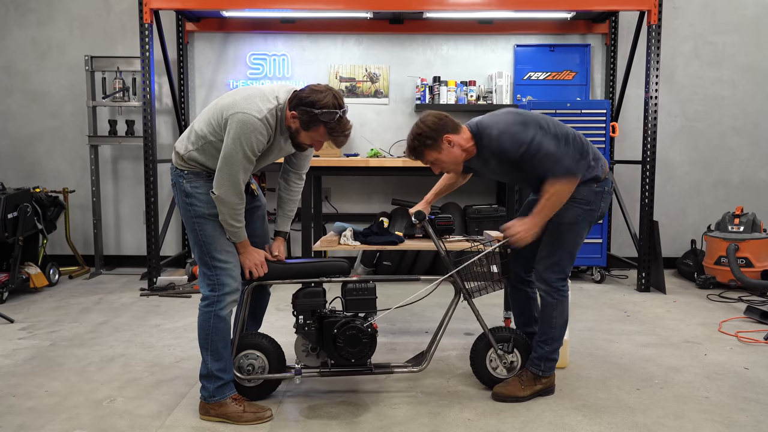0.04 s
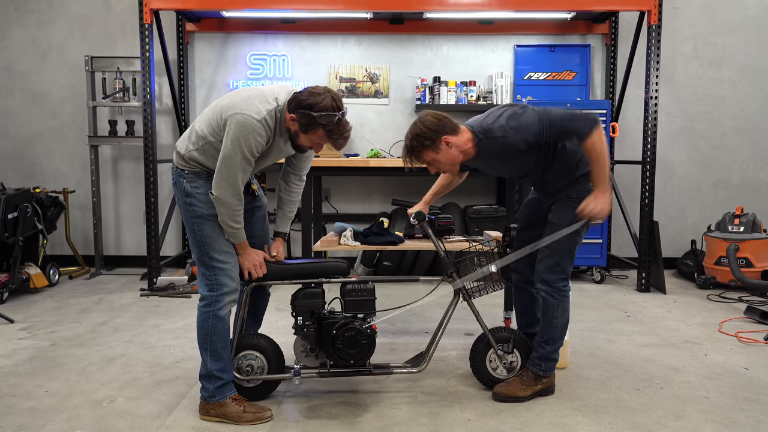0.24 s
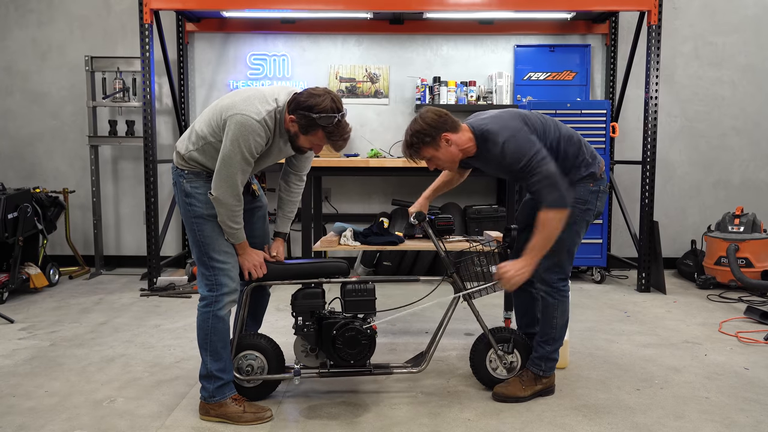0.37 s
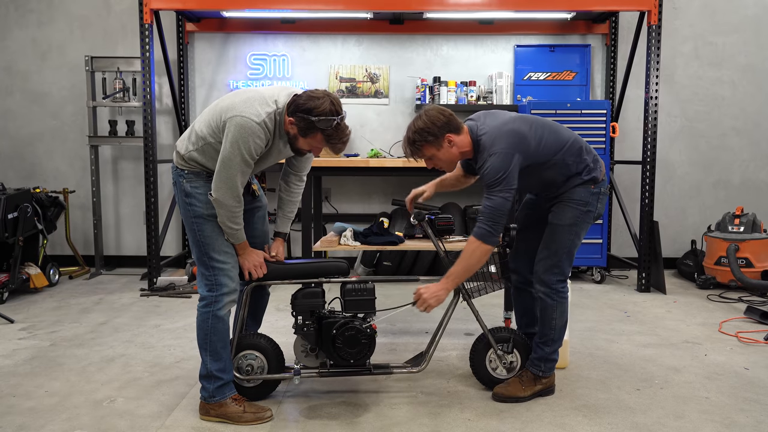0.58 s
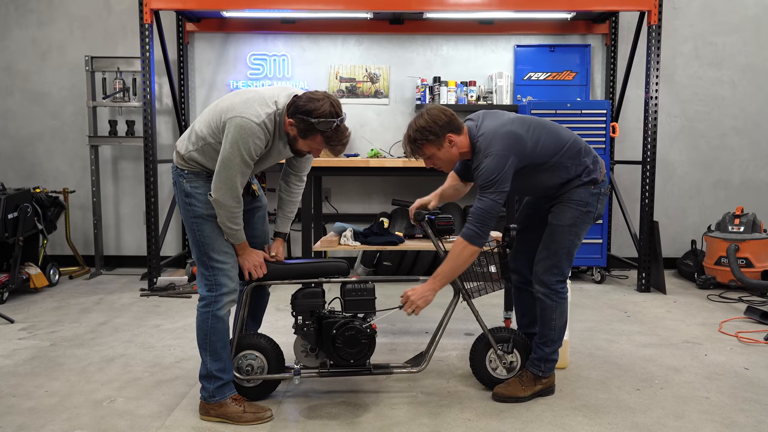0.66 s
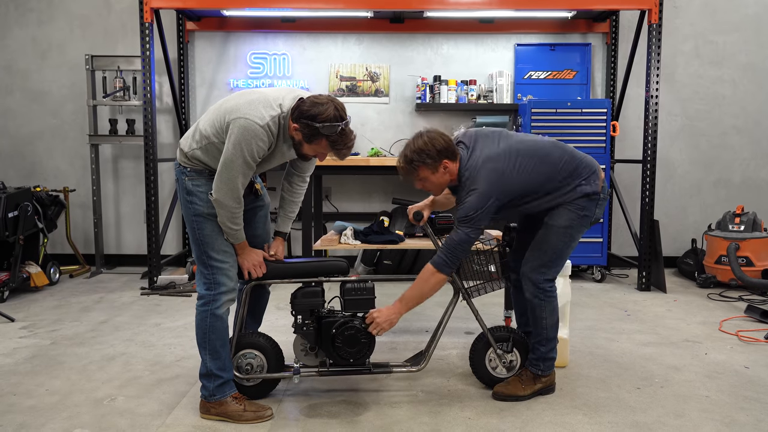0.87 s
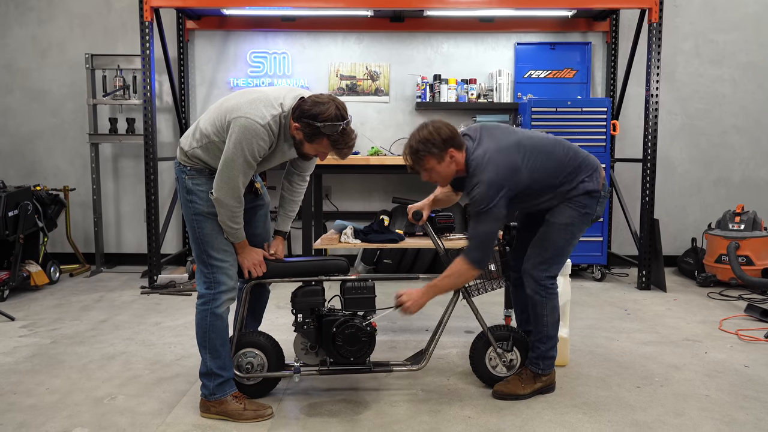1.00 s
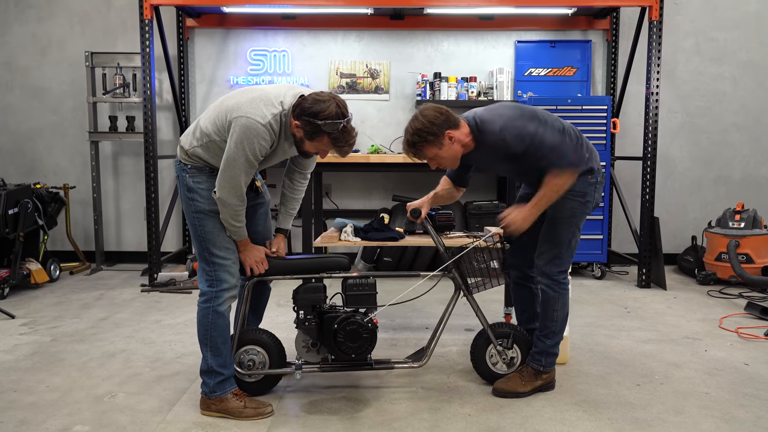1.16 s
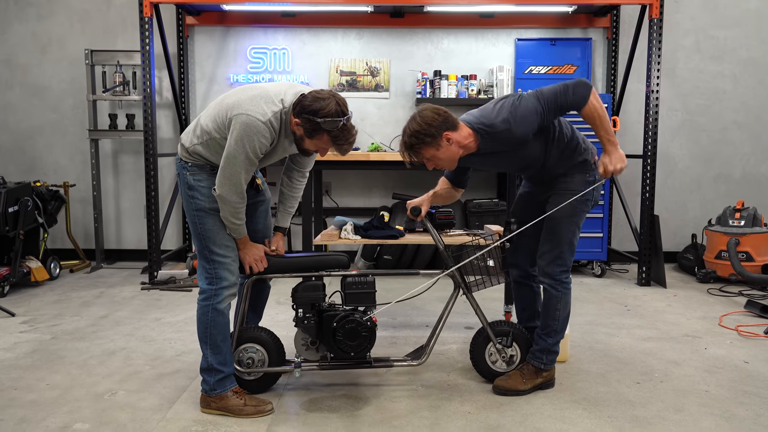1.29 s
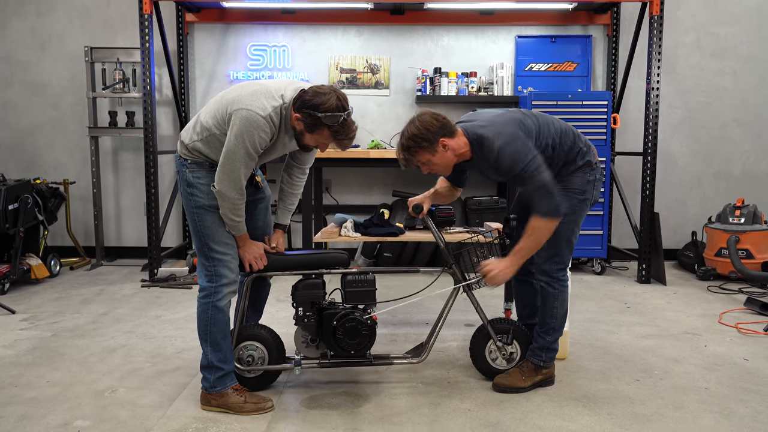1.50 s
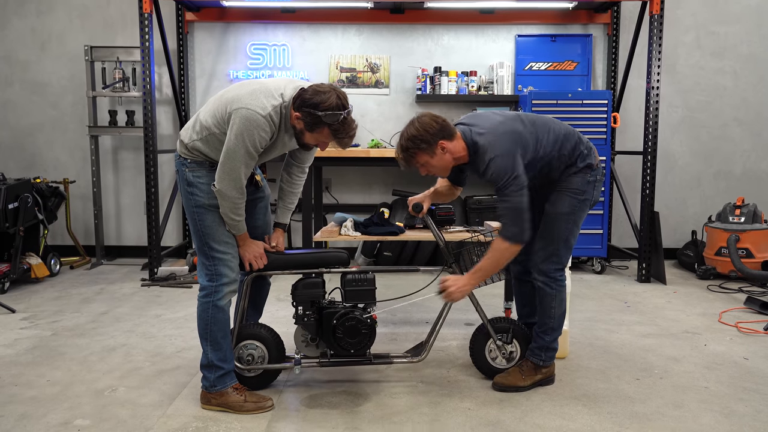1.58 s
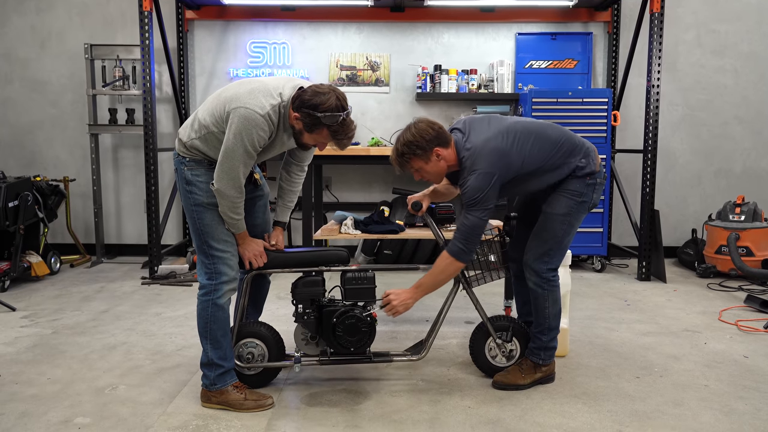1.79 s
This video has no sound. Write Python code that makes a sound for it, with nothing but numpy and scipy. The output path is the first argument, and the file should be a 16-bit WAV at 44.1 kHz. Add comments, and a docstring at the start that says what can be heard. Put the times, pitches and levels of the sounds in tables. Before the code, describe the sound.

Two failed pull starts of a small engine: sharp metal clack, rattle, dull puffs, no ignition

```python
"""Failed pull starts of a small engine

A small engine in a workshop is yanked over twice by its recoil cord and does not catch; an edit joins the pulls.
Intake and exhaust puffs are pressure pulses; rattle and hiss are ticks and noise through resonances.
Clacks are filtered noise bursts, a squeal is narrow-band noise, and ringing metal is a sum of modes.
Sparse reflections add the workshop; filtered noise supplies the rumble and the background air."""
import sys
import numpy as np
from scipy import signal
from scipy.fft import rfft, irfft
from scipy.io import wavfile
from scipy.ndimage import uniform_filter1d

SR = 44100
rng = np.random.default_rng(int(sys.argv[2]) if len(sys.argv) > 2 else 0)


def master_out(mix):
    """Clip the mix to full scale and print it as 16-bit PCM to the path in sys.argv[1]."""
    frames = np.transpose(np.atleast_2d(mix))
    ceiling = np.clip(frames, -1, 1)
    pcm = np.round(ceiling * 32767).astype(np.int16)
    wavfile.write(sys.argv[1], SR, pcm)


N = 81585
EDIT_S = .856  # the second pull takes over here


def amp(db):
    """Decibel law: 20 dB is a factor of ten in amplitude."""
    return 10 ** (np.asarray(db) / 20)


def evened(x):
    """Power normalisation: scales a signal to an RMS of 1."""
    return x / np.sqrt(np.mean(x ** 2) + 1e-20)


def read(points, hz):
    """Interpolation on a logarithmic frequency axis."""
    f, value = np.transpose(points)
    return np.interp(np.log(hz + 1), np.log(f + 1), value)


def add(mix, s, sound):
    """Superposition: adds a sound to the mix from time s, in seconds."""
    part = mix[round(s * SR):][:len(sound)]
    part += sound[:len(part)]


def coloured(x, points):
    """Spectral shaping: weights each frequency by a table of (frequency [Hz], gain [dB])."""
    hz = np.fft.rfftfreq(len(x), 1 / SR)
    return irfft(rfft(x) * amp(read(points, hz)), len(x))


def resonate(x, hz, width_hz):
    """Resonance by heterodyning: shift to zero, low-pass, shift back; gain 1, and the pitch may glide."""
    turn = np.exp(2j * np.pi * np.cumsum(hz * np.ones(len(x))) / SR)
    r = np.exp(-np.pi * width_hz / SR)
    smooth = signal.lfilter([1 - r], [1, -r], x / turn)
    return 2 * (turn * smooth).real


def resonate_twice(x, hz, width_hz):
    """Cascaded resonance: two equal stages steepen the skirts."""
    return resonate(resonate(x, hz, width_hz), hz, width_hz)


def slow_noise(length, size):
    """Low-passed random modulation: noise averaged twice over size samples, at an RMS of 1."""
    return evened(uniform_filter1d(uniform_filter1d(rng.standard_normal(length), size), size))


def curve(table, column=1):
    """Envelope linear in decibels: joins the two pulls' control points, at -100 dB between them."""
    quiet = np.full((2, len(table[0][0])), -100.)
    quiet[:, 0] = .8, EDIT_S - .002
    rows = np.vstack([table[0], quiet, table[1]])
    return amp(np.interp(np.arange(N) / SR, rows[:, 0], rows[:, column]))


def wavering(drive, peaks, blur):
    """Modal filtering: parallel resonances, widened by blur, swell and sink independently as the parts move."""
    waver_db, waver_s = 2.5, .025
    total = np.zeros(N)
    for hz, width, db in peaks:
        sway = slow_noise(N, round(waver_s * SR))
        band = resonate(resonate(drive, hz, blur * width), hz, 2 * blur * width)
        # the square root keeps a level per unit of bandwidth
        total += amp(db + waver_db * sway) * evened(band) * np.sqrt(width)
    return evened(total)


# levels of the rattling works, one list per pull: (time [s], casing level [dB], hiss level [dB])
RATTLE = [
    [(0.0, -38, -54), (0.134, -41, -56.5), (0.28, -25.5, -51), (0.344, -34.5, -42.5), (0.4, -35.5, -57.5),
     (0.54, -49, -80.5), (0.6, -66, -92)],
    [(0.86, -74, -82), (1.046, -68, -80.5), (1.192, -36, -62), (1.28, -35, -54), (1.418, -33, -57),
     (1.62, -46, -76), (1.71, -48, -98), (1.85, -53, -81)],
]
# casing resonances: (frequency [Hz], width before blur [Hz], relative level per bandwidth [dB])
CASING = [(600, 460, -3), (903, 222, 7.5), (1152, 200, 3), (1430, 310, -1), (2060, 210, 5.5),
          (2480, 170, 3.5), (3490, 590, -1.5), (3856, 290, -12), (4450, 260, -3.5), (6100, 140, -23)]
# resonances of the thin hiss: (frequency [Hz], width before blur [Hz], relative level per bandwidth [dB])
HISS = [(6830, 54, 4), (8700, 120, 0), (9900, 120, 2.5), (12300, 37, 2.5), (15200, 200, -5.5),
        (14510, 76, -9)]


def rattle():
    """Impulsive excitation: dense uneven ticks sound the casing and modulate a thin hiss."""
    ticks_per_s, tick_spread_db, hiss_swing_db = 1200, 1.5, 4.0
    strength = amp(tick_spread_db * np.minimum(rng.exponential(1, N), 4))
    ticks = strength * (rng.random(N) < ticks_per_s / SR)
    casing = wavering(ticks * rng.choice([-1, 1], N), CASING, blur=1.066)
    density = evened(uniform_filter1d(ticks - ticks.mean(), 200))
    hiss_drive = rng.standard_normal(N) * amp(hiss_swing_db * np.minimum(density, 2))
    hiss = wavering(hiss_drive, HISS, blur=7.0)
    return curve(RATTLE) * casing + curve(RATTLE, column=2) * hiss


# level of the turning crank, one list per pull: (time [s], level [dB])
RUMBLE = [
    [(0.0, -48), (0.29, -43), (0.422, -48.5), (0.624, -77), (0.7, -91)],
    [(0.86, -76), (1.28, -40), (1.32, -41.5), (1.678, -58.5), (1.85, -81)],
]
# spectrum of the rumble: (frequency [Hz], relative level [dB])
RUMBLE_TONE = [(25, -17.5), (60, -0.5), (110, -4), (200, 2), (350, -12.5), (550, -15.5), (900, -38.5),
               (20000, -101)]


def rumble():
    """Low-frequency random vibration: the turning crank as shaped noise."""
    return curve(RUMBLE) * evened(coloured(rng.standard_normal(N), RUMBLE_TONE))


# spectrum of the background air, one list per pull: (frequency [Hz], relative level [dB])
AIR = [
    [(25, -7.5), (100, -11), (180, -31.5), (520, -42), (780, -7), (1100, -13), (1500, -33), (2100, -10),
     (2800, -26.5), (3500, -27.5), (4600, -33.5), (6000, -45.5), (13000, -100)],
    [(15, -39), (25, -2.5), (97, -3), (203, -7.5), (517, -12.5), (645, -12), (889, -15.5), (1080, -51),
     (9000, -46), (11700, -74), (19800, -120)],
]
AIR_DB = (-68, -64)  # RMS level in each pull


def background_air(pull):
    """Stationary noise: the background of one pull, given by its spectrum."""
    return amp(AIR_DB[pull]) * evened(coloured(rng.standard_normal(N), AIR[pull]))


# air puffs: (centre time [s], level before rebound [dB], sign [+1 intake, -1 exhaust], half-width to 1/e [ms])
PUFFS = [(0.03, -30, 1, 0.97), (.107, -17.5, -1, 1.36), (0.194, -24, 1, 0.57), (0.216, -22.5, 1, 1.35),
         (0.27, -23.5, -1, 2), (0.404, -33, 1, 1.4), (0.503, -28, -1, 1.86), (0.591, -45.5, -1, 1.2),
         (0.911, -48, 1, 2.5), (1.218, -22.5, 1, 1.84), (1.276, -16.5, -1, 1.24), (1.36, -21, 1, 0.35),
         (1.379, -21, 1, 1.06), (1.443, -21, -1, 1.8), (1.531, -48, 1, 1.1), (1.629, -39.5, -1, 1.3)]
# the opposite swing after each push, by sign: delay [ms], level [dB], width as a multiple of the push's
REBOUND_MS = {1: 3.8, -1: 5.3}
REBOUND_DB = {1: -2.0, -1: -3.5}
REBOUND_WIDER = {1: 1.2, -1: 1.4}


def puffs():
    """Pressure pulse and pipe reflection: each push rebounds, returns from the pipe and sets it humming."""
    lead_ms, pipe_ms, pipe_db = 8, 17.0, -7.0
    hum_hz, hum_width_hz, hum_gain = 173, 27, 4 * amp(-12)
    out = np.zeros(N)
    ms = np.arange(-lead_ms, 60, 1000 / SR)
    for s, db, sign, width in PUFFS:
        back_width = width * REBOUND_WIDER[sign]
        back = amp(REBOUND_DB[sign]) * np.exp(-((ms - REBOUND_MS[sign]) / back_width) ** 2)
        push = sign * amp(db) * (np.exp(-(ms / width) ** 2) - back)
        start = s - lead_ms / 1000
        add(out, start, push)
        add(out, start + pipe_ms / 1000, amp(pipe_db) * push)
    return out + hum_gain * resonate(out, hum_hz, hum_width_hz)


# clacks: (time [s], peak level [dB], body frequency [Hz], edge level re body [dB], sizzle level re body [dB],
# thud level re body [dB], rise constant [ms, at least 0.2], fall constant [ms, at least 1],
# first-stage body width [share of body frequency])
CLACKS = [(0.048, -26.5, 1274, -8, -35, -15.5, 3.47, 36, 0.87),
          (0.167, -28.5, 2160, -23, -13, -14, 4.1, 13, 0.98),
          (0.219, -17.5, 1630, -12, -40, -15.5, 1, 9, 0.66),
          (0.231, -14, 1884, -9, -37, -11, 1.5, 9.4, 0.93),
          (0.258, 2, 1590, -7.5, -6.5, -10.5, 0.14, 5.2, 0.17),
          (0.262, 8, 1705, 8, 2, -35, 1.23, 2.4, 0.05), (0.28, -11.5, 2730, 0, -3, -24, 2.7, 25, 0.31),
          (0.431, -26, 1195, -35, -46, -18.5, 2.9, 20.5, 0.94),
          (0.477, -28.5, 2070, 2, -16, -22, 3.6, 9.9, 0.38), (0.857, -44, 878, -6, -22, -9, 1.5, 15, 0.13),
          (0.97, -43, 1450, 3.5, -8, -14, 0.8, 16, 0.35), (0.997, -37.5, 1570, -5, -26, -17, 9, 11.4, 0.76),
          (1.018, -25, 1602, -1, -15, -19, 5.1, 9.8, 0.57), (1.041, -19, 1560, 5, 6.5, -28, 1, 14, 0.25),
          (1.054, -11.5, 1570, -6.5, -18, -14.5, 1, 5.6, 0.097),
          (1.075, 0, 1840, 8.5, 8, -3, 1.3, 4.5, 0.14), (1.08, 0, 1574, -13, -10, -9, 0.42, 5.9, 0.72),
          (1.172, -24.5, 914, 0, -3, -1, 5, 20, 0.62), (1.234, -16.5, 1490, -16, -42, -30, 0.63, 8, 1),
          (1.361, -5.5, 1700, 6, 12, -32.5, 0.73, 5.2, 0.89),
          (1.376, -11.5, 1840, 2, -4, -10, 3.5, 7.1, 0.6),
          (1.399, -9.5, 1516, -9, -14.5, -6.5, 0.65, 5.6, 0.53),
          (1.426, -19.5, 1155, -14, -17, -12, 2, 9.7, 0.18), (1.465, -21, 780, 12, -1, -26, 4.8, 9.7, 0.47),
          (1.553, -31.5, 2060, -21, -35, -35, 2.1, 8.9, 0.48),
          (1.569, -25.5, 938, 8.5, 1.5, -29, 19, 10.3, 0.85),
          (1.632, -31, 1764, -6, -48, -20, 1, 5.6, 0.51),
          (1.677, -33.5, 1490, -35, -48, -23, 0.5, 11.5, 0.29),
          (1.726, -25.5, 2300, -44, -60, -14.5, 1.3, 2.7, 0.15),
          (1.758, -33.5, 1568, -8.5, -27, -5, 3.2, 20, 0.48),
          (1.797, -42, 970, -10.5, -16, -20, 4.5, 7.1, 0.65)]
# spectrum of the sizzle: (frequency [Hz], relative level [dB])
SIZZLE = [(3240, -10), (6000, -7), (7540, -4), (8160, 0.5), (8830, -3.5), (12900, -5), (15700, -6)]


def clacks():
    """Impact radiation: short bursts sum the bands of body, edge, thud and sizzle."""
    edge_hz, edge_width_hz = 3280, 1990
    thud_hz, thud_width_hz = 503, 380
    out = np.zeros(N)
    ms = np.arange(0, 80, 1000 / SR)
    for s, db, hz, edge_db, sizzle_db, thud_db, rise, fall, spread in CLACKS:
        noise = rng.standard_normal((4, len(ms)))
        shape = (1 - np.exp(-ms / max(rise, .2))) * np.exp(-ms / max(fall, 1))
        body = resonate(resonate(noise[0], hz, spread * hz), hz, 2 * spread * hz)
        body = resonate(body, hz, 2 * hz)  # keeps the treble out of dull knocks
        body = evened(body) + 0.93 * np.sin(2 * np.pi * hz * ms / 1000)
        edge = resonate_twice(noise[1], edge_hz, edge_width_hz)
        sizzle = coloured(noise[2], SIZZLE)
        thud = resonate_twice(noise[3], thud_hz, thud_width_hz)
        # edge, thud and sizzle each join the evened body at their own level; the whole burst is then scaled to
        # its peak
        mix = None
        mix = evened(body) + amp(edge_db) * evened(edge) + amp(thud_db) * evened(thud)
        burst = shape * (mix + amp(sizzle_db) * evened(sizzle))
        add(out, s, amp(db) * burst / abs(burst).max())
    return out


# squeal of the pulley, rising with its speed: (start [s], end [s], first frequency [Hz], last frequency [Hz],
# level before fading [dB], width of each filter stage [Hz])
SQUEALS = [(.145, .25, 4750, 5300, -47, 160), (1.258, 1.3, 4780, 4880, -38, 60),
           (1.3, 1.36, 4900, 5050, -46, 170)]


def squeals():
    """Friction-excited vibration: the pulley's thin fuzzy whistle as gliding narrow-band noise."""
    out = np.zeros(N)
    for start, end, from_hz, to_hz, db, width_hz in SQUEALS:
        u = np.linspace(0, 1, round((end - start) * SR))
        hz = from_hz + (to_hz - from_hz) * u
        tone = resonate_twice(rng.standard_normal(N)[:len(u)], hz, width_hz)
        add(out, start, amp(db) * evened(tone) * np.sin(np.pi * u) ** 0.24)
    return out


# small loose parts: (time [s], frequency [Hz], level of the pure tone [dB], fall constant [ms])
PINGS = [(0.233, 945, -23.5, 21), (.258, 1609, -9, 4.3), (1.361, 7000, -19, 2.7), (1.376, 3950, -23, 3.1),
         (1.401, 2210, -17, 5.3), (1.574, 4260, -34.5, 12), (1.578, 6140, -39.5, 6),
         (1.583, 3600, -36, 17.5), (1.676, 2500, -42.5, 20), (1.728, 1800, -34, 12), (1.734, 850, -40, 17)]


def pings():
    """Damped oscillation: small loose parts sound one short note, roughened by narrow-band noise."""
    rise_ms, width_hz, roughness = 1.9, 200, .7
    out = np.zeros(N)
    ms = np.arange(0, 100, 1000 / SR)
    for s, hz, db, fall in PINGS:
        rough = evened(resonate_twice(rng.standard_normal(len(ms)), hz, width_hz))
        note = np.sin(2 * np.pi * hz * ms / 1000) + roughness * rough
        shape = (1 - np.exp(-(ms / rise_ms) ** 2)) * np.exp(-ms / max(fall, 1))
        add(out, s, amp(db) * note * shape / shape.max())
    return out


# the hardest blow on the frame: (time [s], level [dB])
BLOWS = [(0.258, -26.5)]
# steel frame modes: (frequency [Hz], level re blow [dB], time to decay 60 dB [s])
FRAME = [(791, -17.5, 0.88), (927.5, -18.5, 0.72), (1168, -21.5, 0.48), (2198, -3, 0.25),
         (3263, -15.5, 0.097), (3430, -27, 0.94), (4575, -5, 0.55), (4480, -8, 0.35), (5400, -14.5, 0.1),
         (6190, -10, 0.4), (6860, -19, 0.17)]


def frame(shot):
    """Modal superposition: the struck steel frame rings on, its modes fluttering as loose parts touch it."""
    flutter_db, rise_s = 3.5, 0.0029
    settle, settle_s = .022, .12  # modes start flat by this share and creep up with this time constant
    strikes = np.zeros(N)
    for s, db in BLOWS:
        add(strikes, s, amp([db]))
    t = np.arange(SR) / SR
    creep = t - settle * settle_s * (1 - np.exp(-t / settle_s))
    flutters = [slow_noise(SR, 160) for _ in FRAME]
    ring = np.zeros(SR)
    for (hz, db, t60), flutter in zip(FRAME, flutters):
        level = amp(db - 60 * t / t60 + flutter_db * flutter)
        ring += level * np.sin(2 * np.pi * (hz * creep + rng.random()))
    return signal.fftconvolve(shot * strikes, ring * np.minimum(t / rise_s, 1))[:N]


# thin steel part after the hardest blow: (time [s], frequency [Hz], RMS level before wobble [dB])
SINGING = [(0.27, 2510, -36), (0.3, 2508, -29), (0.34, 2513, -32), (0.44, 2520, -42), (0.55, 2533, -41),
           (0.6, 2542, -48), (0.636, 2546, -58), (0.72, 2543, -50), (0.85, 2546, -66)]


def singing():
    """Lightly damped single mode: a thin steel part sings on with drifting pitch and wobbling level."""
    wobble_db = 2
    s, hz, db = np.transpose(SINGING)
    t = np.arange(N) / SR
    level = amp(np.interp(t, s, db, left=-120) + wobble_db * slow_noise(N, 300))
    phase = 2 * np.pi * np.cumsum(np.interp(t, s, hz)) / SR
    return np.sqrt(2) * level * np.sin(phase)


# decay of the workshop: (frequency [Hz], time to decay 60 dB [s])
SHOP = [(100, 0.54), (400, 0.32), (900, 0.41), (1500, 0.21), (3000, 0.23), (6000, 0.34), (12000, 0.082)]


def shop(x):
    """Reverberation: sparse reflections convolve the sound, each band dying at its own rate."""
    shop_db = -9.0
    taps = np.zeros(SR)
    at = np.arange(300, SR - 20, 20)  # one reflection at random in each 20 samples
    taps[at + rng.integers(0, 20, len(at))] = rng.choice([-1., 1.], len(at))
    hz, t, bands = signal.stft(taps, SR, nperseg=256)
    decay = amp(-60 * t / read(SHOP, hz)[:, None])
    tail = signal.istft(bands * decay, SR, nperseg=256)[1]
    return x + amp(shop_db) * signal.fftconvolve(x, tail / np.linalg.norm(tail))[:N]


def scene():
    """Superposition of sources: each pull is its own shot, and the edit cuts the first one's ring."""
    first = np.arange(N) < EDIT_S * SR
    far = clacks() + rattle() + rumble() + squeals()
    close = puffs() + pings() + first * singing()
    out = np.zeros(N)
    for pull, shot in enumerate((first, ~first)):
        room = shop(shot * far + frame(shot))
        out += shot * (room + close + background_air(pull))
    return out[None]


def record(dry):
    """Transducer limits: the microphone drops the deepest bass, peaks overload, then the band is limited."""
    top_hz = 15840
    full = signal.lfilter(*signal.butter(2, 32, "high", fs=SR), dry)
    full = np.clip(full, -.97, .97)
    band_limit = signal.firwin(511, top_hz, window=("kaiser", 9), fs=SR)
    return signal.oaconvolve(full, band_limit[None], "same")


dry = scene()
out = record(dry)
master_out(out)
```